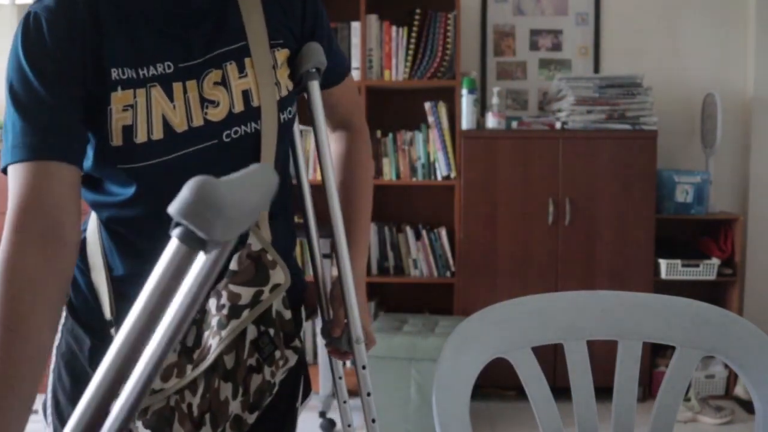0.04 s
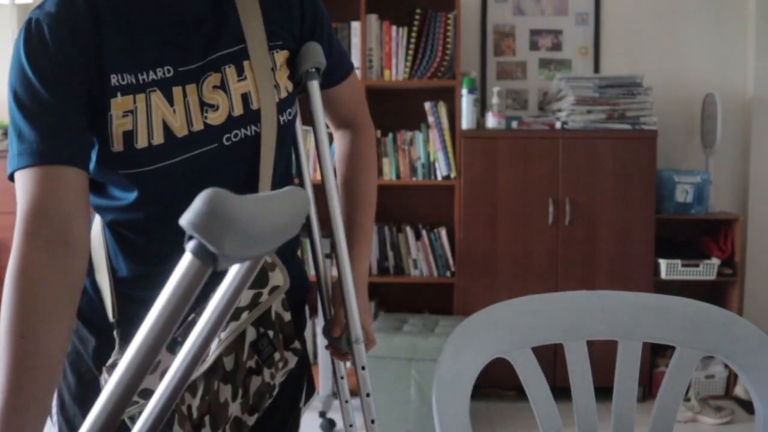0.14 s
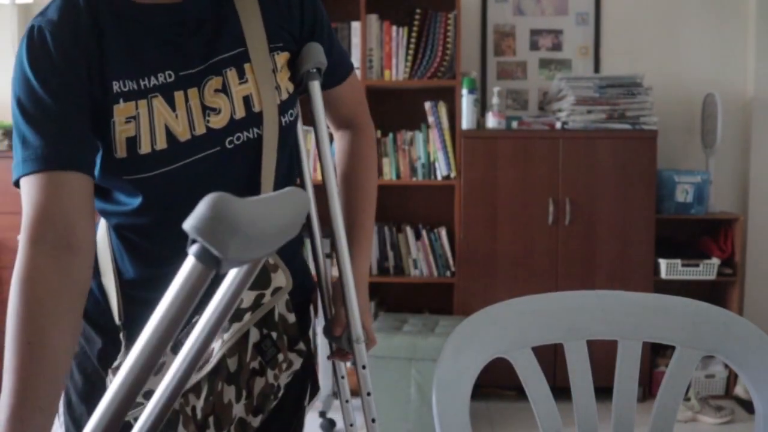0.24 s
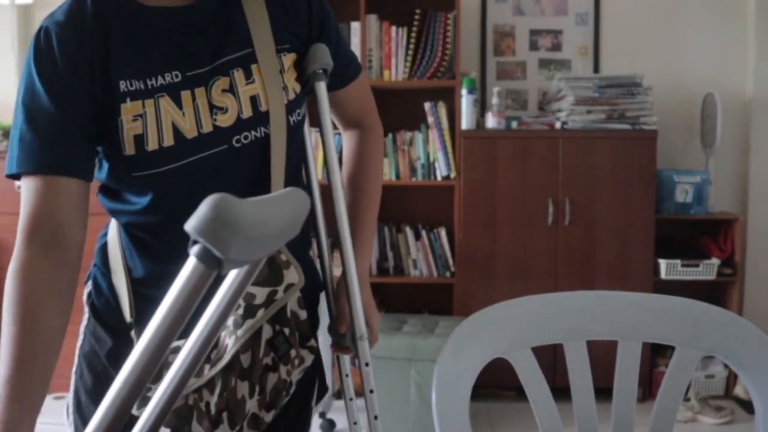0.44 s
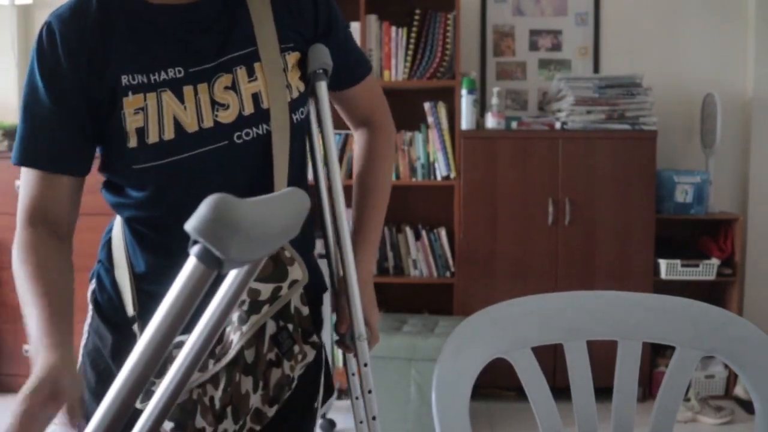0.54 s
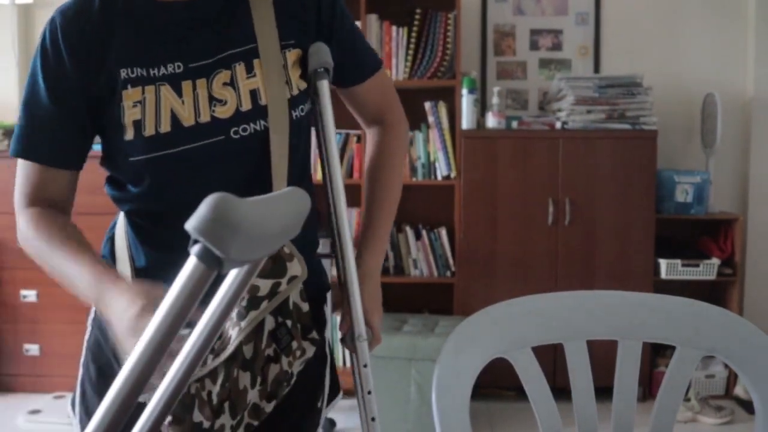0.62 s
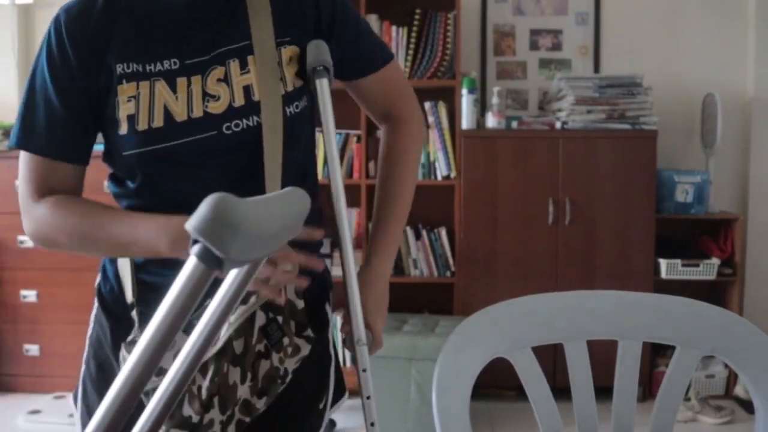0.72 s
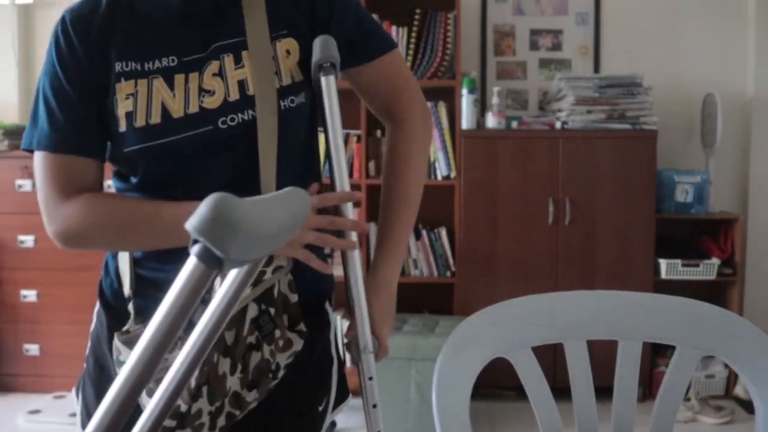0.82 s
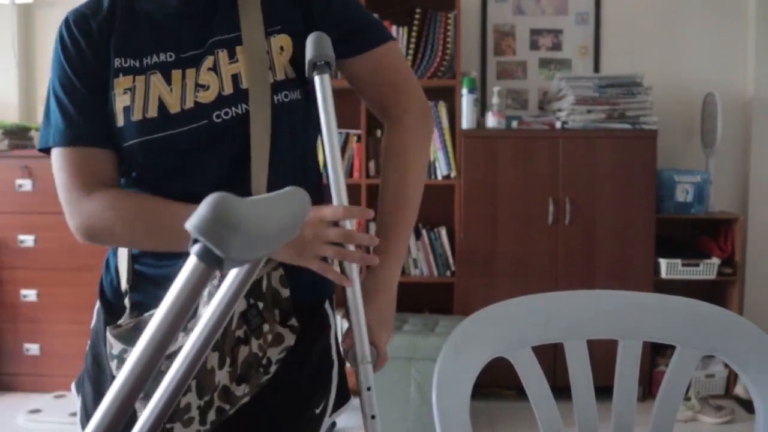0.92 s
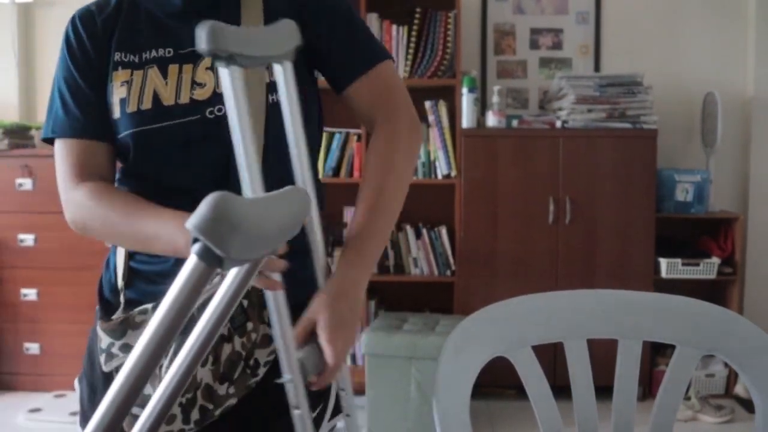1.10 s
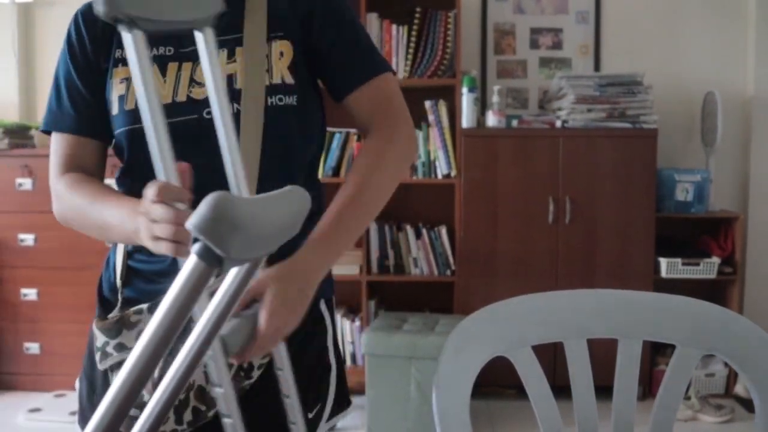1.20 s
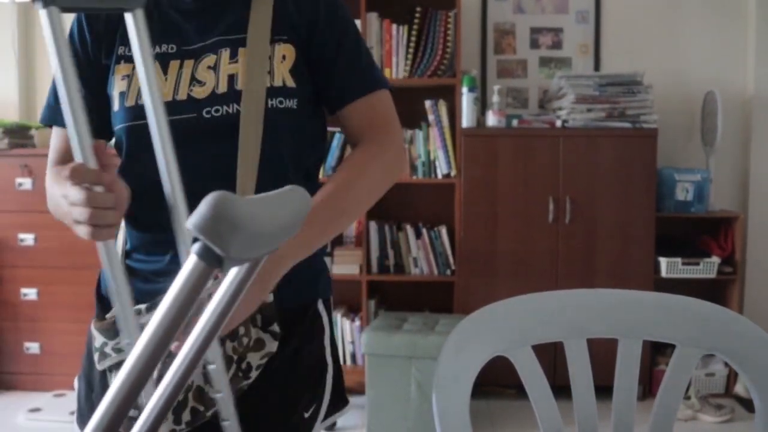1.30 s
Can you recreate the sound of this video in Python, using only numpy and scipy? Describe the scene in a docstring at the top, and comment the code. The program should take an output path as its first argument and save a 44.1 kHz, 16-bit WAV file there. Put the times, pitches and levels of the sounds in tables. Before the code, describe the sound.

One hard, close knock, likely a metal crutch set against furniture, rings briefly through a small room. Clothes then rustle faintly and a second crutch clacks lightly as it is picked up, over a low rumble.

```python
"""A small room. A hard knock close by, likely an aluminium crutch set against furniture: a contact
crack and damped modes, then reflections, a diffuse wash and booming standing waves.
An earlier sound is still dying away at the start. Then clothes rustle and a second crutch is picked
up: a hand slides on the tube, the grip thuds, light clacks ring it. Low rumble and hiss throughout."""
import sys
import numpy as np
from scipy import signal
from scipy.fft import rfft, irfft
from scipy.io import wavfile
from scipy.ndimage import uniform_filter1d

SR = 44100
rng = np.random.default_rng(int(sys.argv[2]) if len(sys.argv) > 2 else 0)


def wrap_up_sound(samples):
    """Save the sound to the file named by the first command line argument, as 16-bit audio."""
    columns = np.atleast_2d(samples).T
    # keep every value between -1 and 1, then stretch to whole-number steps
    tamed = np.clip(columns, -1, 1)
    steps = np.round(tamed * 32767).astype(np.int16)
    wavfile.write(sys.argv[1], SR, steps)


N = 59535
T, HZ = np.arange(N) / SR, np.fft.rfftfreq(N, 1 / SR)
KNOCK_S, WASH_RISE_S = .2262, .005

# stereo width of near sounds: freq_hz, side_to_mid_db
NEAR_WIDTH = [(100, -32), (500, -13), (1200, -9), (2500, 1), (5000, 1), (12000, 6)]
# stereo width of the diffuse field: freq_hz, side_to_mid_db
ROOM_WIDTH = [(60, -16), (130, -29), (220, -18), (380, -9), (700, -6), (1290, -.5), (2380, 2.5), (4400, 6),
              (8120, 7), (15000, 5)]


def knock():
    """A contact crack and heavily damped modes, reflected by near surfaces."""
    # modes of the struck body: pitch_hz, level_db, t60_s
    body_modes = [(194, -33, 0.048), (354, -12.5, 0.052), (536, -6.5, 0.064), (710, -3.5, 0.026),
                  (998, -15, 0.037), (1472, -12.5, 0.039), (1800, -15, 0.017), (2010, -3, 0.013),
                  (2338, -10.5, 0.02), (2687, -19.5, 0.033), (3516, -9.5, 0.016), (4610, -6.5, 0.007),
                  (9800, -21, 0.026)]
    # crack spectrum: freq_hz, density_db
    crack_spectrum = [(100, -17), (500, -1.5), (2200, 1.5), (3600, -9), (5200, -12.5), (7500, -28.5),
                      (10000, -9), (13000, -43), (16000, -42)]
    # first reflections: delay_s, gain_db, right_lag_s
    reflections = [(.0032, -11, 0.0069), (.0063, -26, -0.004), (0.0114, -25, -0.013), (.0205, -15, 0.0049),
                   (.0247, -17, -0.0013)]
    rise_s, right_lag_s, low_cut_hz, echo_top_hz = .00052, .00006, 111, 2500
    body = np.array([sum((-1) ** k * mode(*row, lag_s) for k, row in enumerate(body_modes))
                     for lag_s in (0, right_lag_s)])
    crack = amp(-6) * burst(peak_s=.00091, sharpness=2.22) * noise(curve(crack_spectrum), NEAR_WIDTH)
    direct = signal.lfilter(*signal.butter(2, low_cut_hz, "high", fs=SR), body * rise(rise_s) + crack)
    left, right = signal.lfilter(*signal.butter(1, echo_top_hz, fs=SR), direct)
    echoes = sum(amp(gain_db) * np.array([delay(left, delay_s), delay(right, delay_s + lag_s)])
                 for delay_s, gain_db, lag_s in reflections)
    return delay(direct + echoes, KNOCK_S)


def room_boom():
    """The knock fills the room with a diffuse wash and excites its standing waves."""
    # wash spectrum: freq_hz, density_db
    wash_spectrum = [(40, -25), (100, 1), (170, -1), (240, -4.5), (295, -4), (380, 0), (450, -7.5),
                     (540, 7.5), (700, 3), (980, 0), (1150, -2), (1900, 0), (2600, -7.5), (3800, -20),
                     (5500, -25), (7000, -36.5), (9700, -21.5), (12500, -34), (14500, -50)]
    # standing waves: pitch_hz, level_db, t60_s, rise_s
    room_modes = [(74.6, -14, 0.41, 0.089), (133.6, -11, 0.97, 0.073), (169.8, -28, .8, 0.022),
                  (212.3, -29, 0.62, 0.018), (256.6, -29.5, 0.63, 0.0083), (340.8, -22.5, 0.62, 0.011),
                  (394.3, -23, 0.47, .01), (514, -24, 0.86, 0.0067), (544.6, -32, 1.09, 0.0039),
                  (631.4, -22, 0.44, 0.0059), (665, -30.5, 0.76, .01), (719.4, -30, 0.71, 0.0058),
                  (896, -32.5, 0.48, .01), (989, -30.5, .5, 0.0033), (1410, -31.5, 0.75, 0.0054),
                  (1712, -28, 0.4, .01), (1792, -30, 0.22, 0.0054), (1865, -40, 0.65, 0.0083)]
    beat_hz, beat_db_per_octave, lowest_hz = 17, 1.18, room_modes[0][0]
    wash = amp(-15.5) * room_tail(curve(wash_spectrum)) * rise(WASH_RISE_S)
    boom = np.zeros(N)
    for pitch_hz, level_db, t60_s, rise_s in room_modes:
        # higher modes waver, as if beating with close neighbours
        beat_db = beat_db_per_octave * np.log2(pitch_hz / lowest_hz) * waver(beat_hz)
        boom += mode(pitch_hz, level_db + beat_db, t60_s) * rise(rise_s)
    return delay(wash + boom, KNOCK_S)


def clack(start_s, level_db, centre_hz, width_oct, ring_db):
    """A light contact, coloured by the tube, rings on in the tube and the room."""
    # tube resonances: pitch_hz, relative_db, t60_s
    tube_modes = [(1334, -0.5, 0.11), (1530, -10.5, 0.18), (2068, -8, .18), (2175, -12.5, .22),
                  (2620, -4.5, 0.099), (3640, -4, 0.28), (4180, -10, 0.2), (4470, -17, 0.17),
                  (7700, -32, .15)]
    valley_db, half_width_hz, top_hz, peak_s, room_db = -21, 130, 12100, .0011, -15
    peaks = sum(amp(db) / (1 + ((HZ - hz) / half_width_hz) ** 2) for hz, db, _ in tube_modes)
    force_db = hump_db(centre_hz, width_oct) - 10 * np.log10(1 + (HZ / top_hz) ** 20)
    colour_db = force_db + 20 * np.log10(amp(valley_db) + peaks)
    tick = burst(peak_s) * noise(colour_db, NEAR_WIDTH)
    ring = sum(amp(ring_db + np.interp(hz, HZ, force_db)) * mode(hz, db, t60_s, rng.random((2, 1)))
               for hz, db, t60_s in tube_modes)
    tail = amp(room_db) * room_tail(colour_db) * rise(WASH_RISE_S)
    return amp(level_db) * delay(tick + ring * rise(peak_s) + tail, start_s)


def handling():
    """The second crutch clacks as it is picked up."""
    # contacts: start_s, level_db, centre_hz, width_oct, ring_db
    contacts = [(.664, -50, 7000, .45, -20), (.680, -42, 1400, .5, -20), (1.1037, -35, 6500, .8, -9),
                (1.1075, -26.5, 2100, .7, -6), (1.120, -40, 3800, .9, -4), (1.126, -37, 2400, .7, 2),
                (1.149, -40, 3500, .8, -2)]
    return sum(clack(*row) for row in contacts)


def grip():
    """A soft, low thud as the crutch is taken up."""
    thud = mode(pitch_hz=165.7, level_db=-40, t60_s=.4) + mode(pitch_hz=251, level_db=-42.5, t60_s=.53)
    return delay(thud * rise(.0091), delay_s=1.112)


def rustle():
    """Cloth rubs in small clumps as the arms move; a hand slides on the tube."""
    # cloth envelope: time_s, level_db
    cloth_envelope = [(0, -87), (.62, -62), (.8, -52), (.91, -45.5), (.97, -46), (1.03, -48), (1.12, -45),
                      (1.23, -51.5), (1.35, -59)]
    # cloth spectrum: freq_hz, density_db
    cloth_spectrum = [(150, 1.5), (400, 1.5), (1000, -4), (2500, -7), (5000, -14), (7500, -16.5),
                      (10000, -16.5), (12500, -20.5), (15500, -48)]
    # cloth stereo width: freq_hz, side_to_mid_db
    cloth_width = [(60, -26), (110, -11), (200, -2.5), (380, -15), (700, -10), (1290, -3), (2380, 1),
                   (4400, 5), (8120, 4.5), (15000, 6)]
    grain_db, grain_s = 1, .0063
    slide_db, slide_peak_s, slide_half_s = -45.5, 1.056, .03
    clumps = uniform_filter1d(rng.standard_normal(N), int(grain_s * SR))
    grain = amp(grain_db * clumps / clumps.std())
    cloth = amp(np.interp(T, *np.transpose(cloth_envelope))) * noise(curve(cloth_spectrum), cloth_width)
    swell = amp(slide_db) * np.exp(-((T - slide_peak_s) / slide_half_s) ** 2)
    slide = swell * noise(hump_db(centre_hz=1500, width_oct=.86), ROOM_WIDTH)
    return grain * (cloth + slide)


def earlier_tail():
    """An earlier sound dies away as reverberation and a low hum."""
    # tail spectrum: freq_hz, density_db
    tail_spectrum = [(53, -48), (90, -4), (196, -6), (261, -8), (523, -8), (1010, -14.5), (1610, -15.5),
                     (10200, -47.5), (12000, -51), (15600, -84), (22000, -120)]
    return amp(-30) * room_tail(curve(tail_spectrum)) + mode(pitch_hz=190, level_db=-38.5, t60_s=1.0)


def room_tone():
    """Steady low rumble and faint hiss."""
    # quiet room spectrum: freq_hz, density_db
    floor_spectrum = [(15, -24), (40, 4), (70, -21.5), (130, -10), (250, -12.5), (500, -17.5), (1000, -22),
                      (2000, -37.5), (4000, -42.5), (7500, -55), (10500, -37.5), (11500, -52.5),
                      (13000, -85)]
    # its stereo width: freq_hz, side_to_mid_db
    floor_width = [(40, -46), (130, -23.5), (400, -7), (1200, 0.5), (10000, 10)]
    return amp(-42.5) * noise(curve(floor_spectrum), floor_width)


def room_tail(spectrum_db):
    """Diffuse noise; each band decays at the room's own rate."""
    # reverberation time: freq_hz, t60_s
    room_t60 = [(100, 0.78), (260, 0.54), (700, 0.63), (1840, .64), (4850, 0.65), (12000, 0.55)]
    freq_hz, time_s, bands = signal.stft(noise(spectrum_db, ROOM_WIDTH), SR, nperseg=512, noverlap=384)
    decay = amp(-60 * time_s / curve(room_t60, freq_hz)[:, None])
    return signal.istft(bands * decay, SR, nperseg=512, noverlap=384)[1][:, :N]


def amp(db):
    """Decibels to gain."""
    return 10 ** (np.asarray(db) / 20)


def curve(points, at_hz=HZ):
    """Interpolates a table on a log-frequency axis."""
    freq_hz, value = np.transpose(points)
    return np.interp(np.log(at_hz + 1), np.log(freq_hz + 1), value)


def delay(x, delay_s):
    """Fractional delay of each channel."""
    return np.apply_along_axis(lambda channel: np.interp(T - delay_s, T, channel, left=0), -1, x)


def hump_db(centre_hz, width_oct):
    """A broad spectral hump."""
    return -40 * np.log10(1 + (np.log2((HZ + 1) / centre_hz) / width_oct) ** 2 / 2)


def noise(spectrum_db, width):
    """Coloured stereo noise, mid channel at unit RMS."""
    white = rfft(rng.standard_normal((2, N)))
    mid, side = irfft(white * amp([spectrum_db, spectrum_db + curve(width)]), N)
    return np.array([mid + side, mid - side]) / mid.std()


def burst(peak_s, sharpness=1):
    """Envelope of one brief contact."""
    return (T / peak_s * np.exp(1 - T / peak_s)) ** sharpness


def rise(rise_s):
    """Exponential build-up from 0 to 1."""
    return 1 - np.exp(-T / rise_s)


def mode(pitch_hz, level_db, t60_s, lag_s=0):
    """One decaying partial; the lag shifts only its phase."""
    return amp(level_db - 60 * T / t60_s) * np.sin(2 * np.pi * pitch_hz * (T - lag_s))


def waver(rate_hz):
    """Slow random drift, unit RMS."""
    drift = irfft(rfft(rng.standard_normal(N)) * np.exp(-(HZ / rate_hz) ** 2), N)
    return (drift - drift.mean()) / drift.std()


def scene():
    """All sources over the room tone."""
    background = room_tone()
    return knock() + room_boom() + earlier_tail() + handling() + grip() + rustle() + background


def record(dry):
    """The knock just overloads the input; a low-pass limits the band."""
    knee, cutoff_hz = 4, 16400
    clipped = dry / (1 + abs(dry) ** knee) ** (1 / knee)
    low_pass = signal.firwin(255, cutoff_hz, window=("kaiser", 9), fs=SR)
    return signal.oaconvolve(clipped, low_pass[None], "same")


dry = scene()
out = record(dry)
wrap_up_sound(out)
```